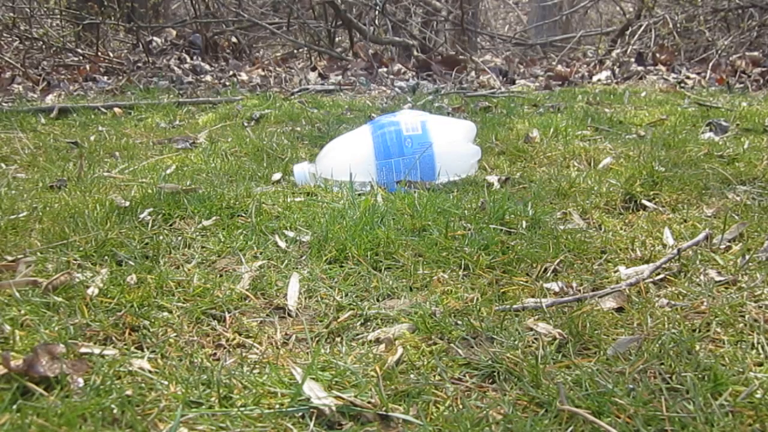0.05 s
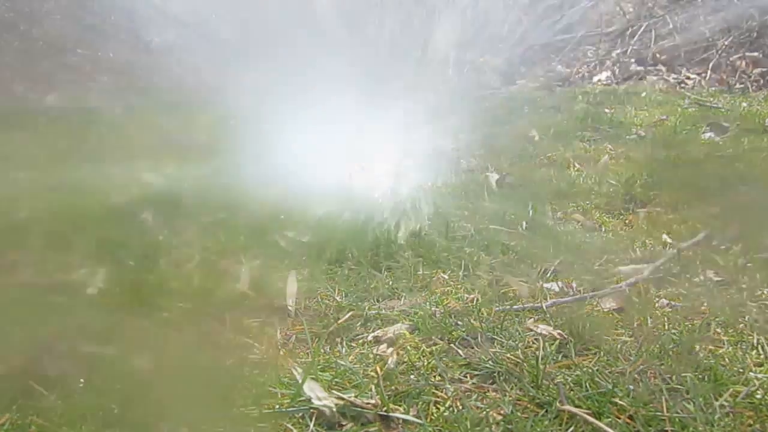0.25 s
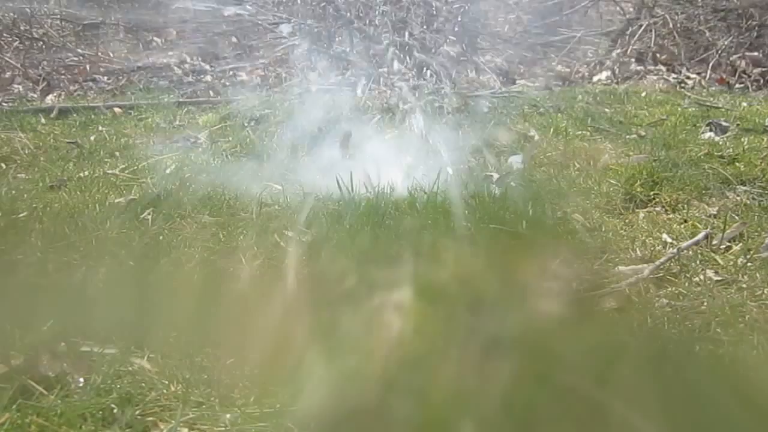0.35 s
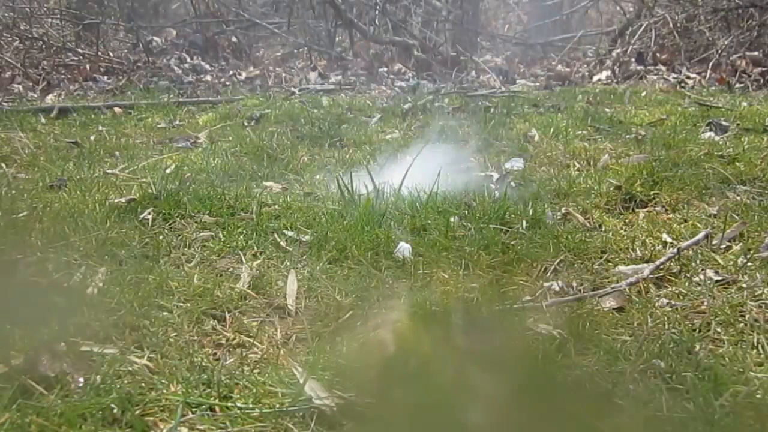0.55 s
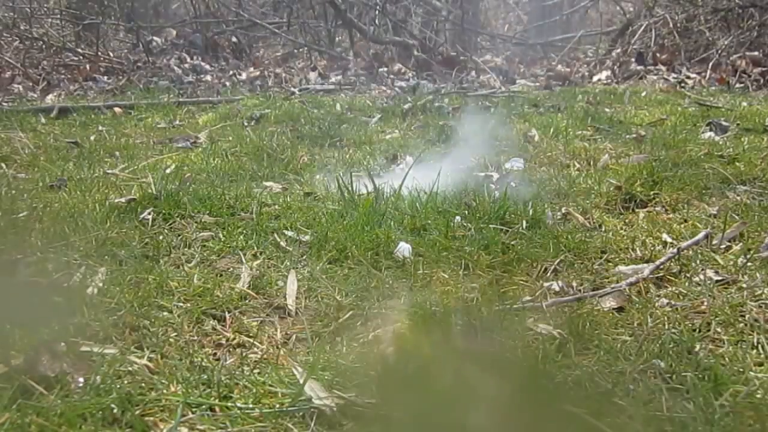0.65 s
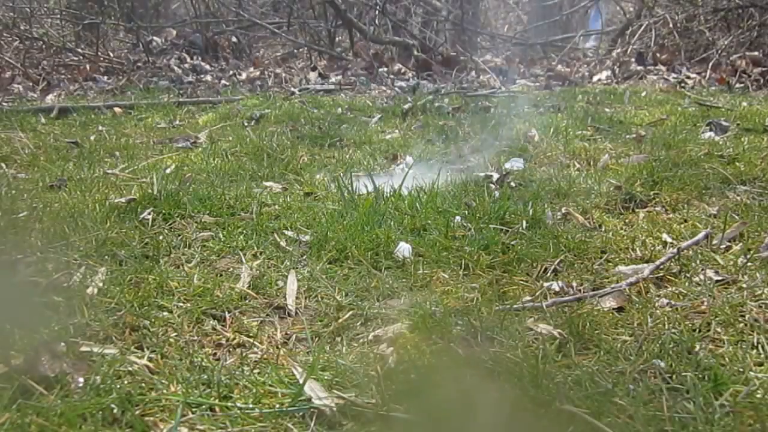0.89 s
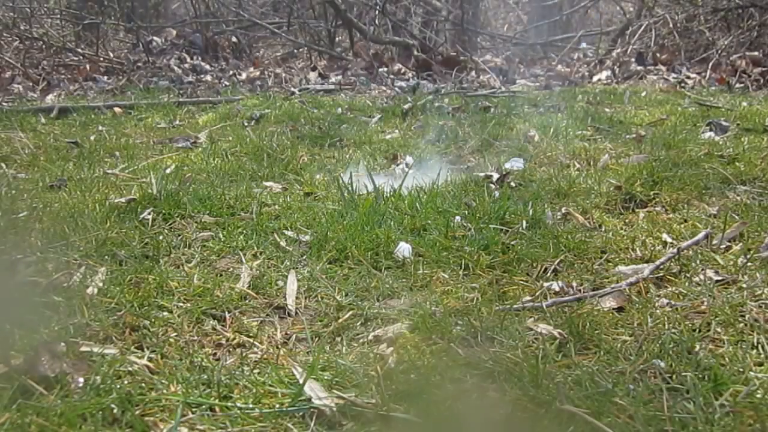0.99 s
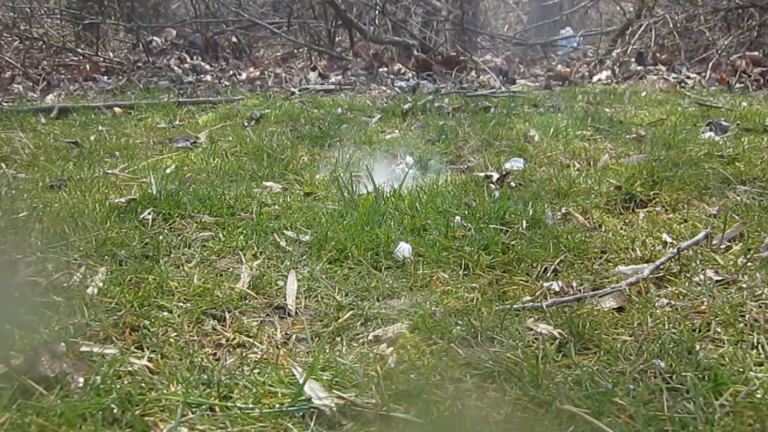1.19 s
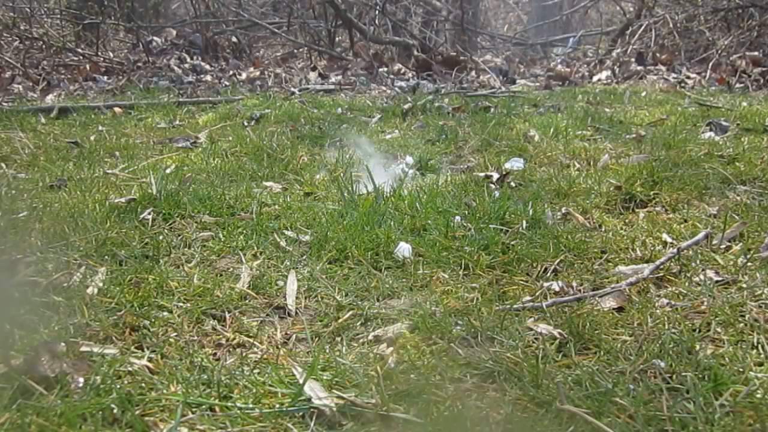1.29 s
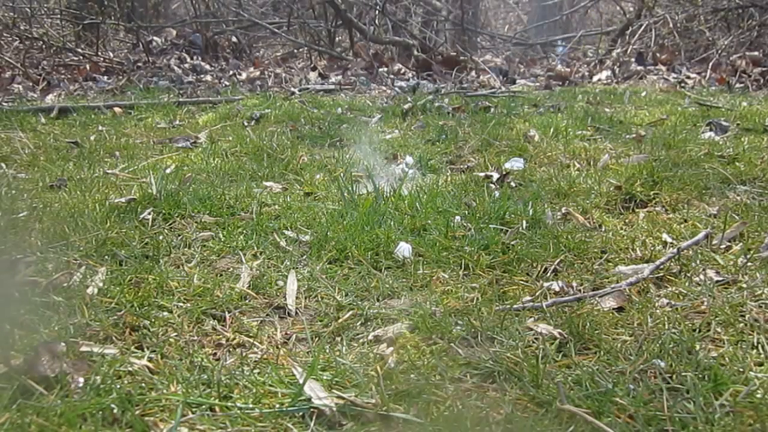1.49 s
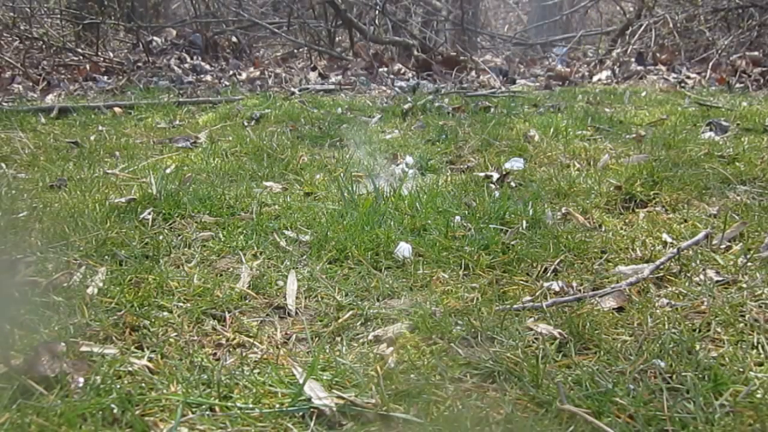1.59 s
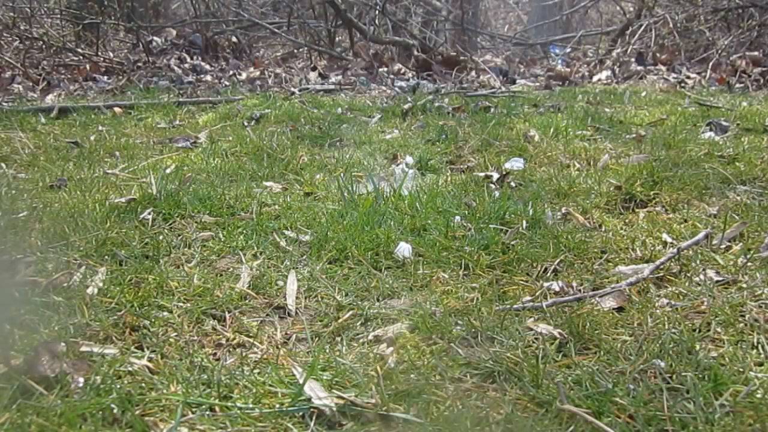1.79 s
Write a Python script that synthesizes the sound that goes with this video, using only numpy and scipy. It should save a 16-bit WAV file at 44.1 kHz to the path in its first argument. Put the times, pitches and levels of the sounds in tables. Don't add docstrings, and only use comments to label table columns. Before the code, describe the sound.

Loud explosive pop of a plastic bottle, distorted and sudden, then a dull rolling woodland echo

```python
import sys
import numpy as np
from scipy import signal
from scipy.io import wavfile

SR = 44100
rng = np.random.default_rng(int(sys.argv[2]) if len(sys.argv) > 2 else 0)


def log_audio(samples):
    frames = np.atleast_2d(samples).T
    limited = np.clip(frames, -1, 1)
    pcm = np.round(limited * 32767).astype(np.int16)
    wavfile.write(sys.argv[1], SR, pcm)


def volts(x):
    e = np.asarray(x, float) / 20
    return 10 ** e


N = 81585

BANG_S = 0.2018
RAIL = 0.41


def time():
    return np.arange(N) / SR


def rms_one(x):
    return x / np.sqrt(np.mean(x ** 2) + 1e-20)


def read(points, at, scale=np.log):
    x, y = np.transpose(points)
    return np.interp(scale(at), scale(x), y)


def dying(start, t60, hold=0.0):
    falling_s = np.maximum(time() - start - hold, 0)
    return (time() >= start) * volts(-60 * falling_s / t60)


def drift(rate):
    steps = rng.standard_normal(400)
    return np.interp(time() * rate, np.arange(400), steps)


def ring(clicks, hz, t60):
    r = volts(-60 / (t60 * SR))
    w = 2 * np.pi * hz / SR
    return signal.lfilter([0, np.sin(w)], [1, -2 * r * np.cos(w), r * r], clicks + 1e-18)


def low_pass(x, hz, order):
    return signal.sosfilt(signal.butter(order, hz, fs=SR, output="sos"), x)


def band(x, low_hz, high_hz, order=2):
    edges = [low_hz, min(high_hz, 0.45 * SR)]
    return signal.sosfilt(signal.butter(order, edges, "band", fs=SR, output="sos"), x)


def coloured(white, spectrum, change_db=lambda hz: 0):
    edges = 25 * 2 ** np.arange(0, 9.6, 1 / 3)
    centres = np.sqrt(edges[1:] * edges[:-1])
    power = np.sum(volts(read(spectrum, centres)) ** 2 * np.diff(edges))
    out = np.zeros(N)
    for k, hz in enumerate(centres):
        noise = band(white[k % 2], edges[k], edges[k + 1], order=4)
        out += volts(read(spectrum, hz) + change_db(hz)) * noise
    return out / np.sqrt(power / (SR / 2))


def grains(rate, spread_db):
    sizes = volts(spread_db * np.minimum(rng.exponential(1, (2, N)), 3))
    signs = rng.choice([-1, 1], (2, N))
    return sizes * signs * (rng.random((2, N)) < rate / SR)


# f/Hz, level/dB per Hz
AIR_AND_HISS = [(40, 26.5), (200, 1.5), (850, -3), (2000, -0.5), (4000, -13.5), (8000, -11), (11000, -20.5),
                (16000, -24.5)]


def floor():
    duck_db, recover_db_per_s, settle_db = -22, 38.5, 1.5
    since_s = time() - BANG_S
    gain_db = (since_s > 0) * np.minimum(duck_db + recover_db_per_s * since_s, settle_db)
    return volts(-55 + gain_db) * coloured(rng.standard_normal((2, N)), AIR_AND_HISS)


# t/s, peak level/dB
MOTOR_STEPS = [(.0004, -26), (.0263, -24), (.0409, -42), (.0523, -23), (.0764, -42), (.0802, -27),
               (.1047, -27), (.1274, -40), (.1316, -24), (.1475, -42), (.1583, -24), (.1805, -36),
               (.1845, -27)]
# f/Hz, level/dB, t60/s
HOUSING_MODES = [(2070, -9, 0.054), (3870, -14.5, 0.026), (5520, -13, 0.052), (6000, -13.5, 0.01),
                 (6140, -2.5, 0.033), (7076, -41, 0.019), (7930, 0.5, 0.017), (8800, 3.5, 0.011),
                 (9870, -12, 0.0221), (10830, 5.5, 0.013), (11950, -35, 0.019), (12280, -34, 0.016)]


def lens_motor():
    mode_db = -10
    rattle_db, rattle_t60_s = -22, 0.045
    snap_db, snap_t60_s = -9, 0.014
    steps = np.array(MOTOR_STEPS)
    strike_s = steps[:, 0] + 0.0006
    ringing = np.zeros(N)
    for hz, db, t60 in HOUSING_MODES:
        clicks = np.zeros(N)
        uneven_db = rng.normal(0, 1, len(steps))
        clicks[(strike_s * SR).astype(int)] = volts(steps[:, 1] + db + mode_db + uneven_db)
        ringing += ring(clicks, hz, min(0.7 * t60, 0.022))
    rattle = np.zeros(N)
    for s, db in zip(strike_s, steps[:, 1]):
        rattle += volts(db + rattle_db) * dying(s, rattle_t60_s)
        rattle += volts(db + snap_db) * dying(s, snap_t60_s)
    noise = rms_one(band(rng.standard_normal(N), 3000, 11000))
    return band(ringing + rattle * noise, 1600, 17000)


# t/s, level/dB
ECHO_LOUDNESS = [(0.305, -8), (0.313, -20), (0.403, -24.5), (0.445, -27.5), (0.489, -25.5), (0.845, -28),
                 (0.863, -28), (0.881, -29), (1.117, -32), (1.151, -36), (1.337, -34), (1.353, -26.5),
                 (1.367, -33.5), (1.809, -40), (1.85, -37.5)]
# f/Hz, level/dB per Hz
ECHO_COLOUR = [(40, -11.5), (420, 3), (750, -2), (910, -10.5), (1230, -4.5), (1800, -8.5), (4000, -40.5),
               (16000, -105)]
# f/Hz, loss/dB per s
PATH_LOSS = [(100, -0.5), (400, 4), (800, 5), (1250, -1), (1900, 14), (4000, 45.5), (8000, 111),
             (16000, 124)]


def woods():
    patchy_db = 0.98
    age_s = time() - BANG_S - 0.49
    together = drift(36)

    def change_db(hz):
        path_db = np.minimum(-read(PATH_LOSS, hz) * age_s, 30.0)
        return path_db + patchy_db * (together + drift(23))

    echoes = coloured(rms_one(grains(1800, 4.0)), ECHO_COLOUR, change_db)
    echoes = echoes + volts(-29) * ring(echoes, hz=1281, t60=0.0079)
    return volts(read(ECHO_LOUDNESS, time(), scale=np.asarray)) * echoes * (time() > BANG_S)


# t/s, level/dB, f/Hz, t60/s
HOUSING_SLAPS = [
    (0.2971, 20, 1270, 0.018),
    (.3025, 17.5, 1703, 0.012),
    (0.27, 13.5, 1502, 0.0067),
    (0.3222, 3, 1450, 0.0084),
    (.4998, -10, 2060, 0.0083),
    (.538, -33, 5530, 0.017),
]
# t/s, peak level/dB, f/Hz, t60/s
LANDINGS_AND_TICKS = [(0.3317, -17, 4930, 0.0096), (.345, -43, 11000, 0.0072), (0.3592, -3, 4470, 0.0067),
                      (0.3594, -17.5, 11000, 0.01), (.367, -24, 7500, 0.0047), (.374, -36, 12500, 0.0046),
                      (.379, -39, 12500, .006), (.391, -23.5, 4800, 0.0048), (.398, -44, 11860, 0.0055),
                      (.412, -45, 9000, .006), (.422, -51, 10100, 0.0052), (0.4477, -35.5, 10600, 0.0068),
                      (0.454, -40.5, 7500, 0.0046), (.461, -57, 8000, .005), (0.4728, -37, 7400, 0.0039),
                      (0.501, -30.5, 4000, 0.012), (.517, -48, 8000, 0.0039), (0.534, -43, 5940, 0.0071),
                      (0.5345, -31.5, 4780, 0.011), (1.256, -52, 6000, .006), (1.315, -53, 8000, .015),
                      (1.577, -48, 4000, .008), (1.675, -47, 4500, .008), (1.716, -49, 4000, .006),
                      (1.76, -48, 5000, .018), (1.812, -49, 6000, .006), (1.832, -47, 5000, .008),
                      (.2955, 9.5, 4850, .012)]


def shreds():
    out = np.zeros(N)
    for s, db, hz, t60 in HOUSING_SLAPS:
        tone = dying(s, t60) * np.sin(2 * np.pi * hz * (time() - s))
        out += volts(db) * band(tone + 1e-18, hz / 2.0, hz * 1.39)
    noise = rng.standard_normal(N)
    for s, db, hz, t60 in LANDINGS_AND_TICKS:
        out += volts(db - 4) * band(dying(s, t60) * noise + 1e-18, hz / 1.5, hz * 1.6)
    patter = grains(110, 3.0) * np.clip(time() - 0.6, 0, 0.9)
    bright, dull = band(patter[0], 5000, 10000), band(patter[1], 2500, 7000)
    return out + volts(-47) * (bright + dull)


# f/Hz, level/dB per Hz
ROAR_COLOUR = [(60, 1.5), (200, -7), (420, 6.5), (1100, -9), (2500, -16), (6500, -28.5), (16000, -49.5)]
# t/s, push/overload points
GUST_PUSH = [
    (.2708, 0),
    (.2713, 8),
    (.281, 8),
    (.282, 2.5),
    (.295, 2),
    (.2962, 0),
]


def blast():
    white = rng.standard_normal((2, N))
    roar = volts(8) * coloured(white, ROAR_COLOUR) * dying(BANG_S, t60=0.01, hold=0.062)

    crack = volts(11) * rms_one(band(rng.standard_normal(N), 1500, 9000))
    crack = crack * dying(BANG_S, t60=0.19) * (time() < GUST_PUSH[2][0])

    spattering = (time() > 0.2812) * (time() < 0.297)
    drops = volts(11) * low_pass(np.abs(grains(1700, 1.0)[0]) * spattering, 5500, order=2)

    mist = volts(-33.5) * rms_one(band(rng.standard_normal(N), 2500, 9000))
    mist = mist * dying(GUST_PUSH[-1][0], t60=0.1)

    kick = 20 * dying(BANG_S, t60=0.001)
    gust = RAIL * read(GUST_PUSH, time(), scale=np.asarray)
    return roar + crack + mist - drops - kick + gust


def scene():
    return (floor() + lens_motor() + woods() + shreds() + blast())[None]


def band_limit(x):
    return signal.sosfilt(signal.butter(12, 17720, fs=SR, output="sos"), x)


def record(dry):
    settled, first, bite_s = 0.52, 1.0, 0.0012
    since_s = np.maximum(time() - BANG_S, 0)
    limit = settled + (first - settled) * np.exp(-since_s / bite_s)
    rail = RAIL * limit / settled
    x = np.clip(dry, -rail, rail)
    x = signal.lfilter(*signal.butter(1, 150, "high", fs=SR), x)
    x = low_pass(np.clip(x, -limit, limit), 16500, order=8)
    x = signal.lfilter(*signal.butter(1, 9000, fs=SR), x)
    return band_limit(x)


dry = scene()
out = record(dry)
log_audio(out)
```